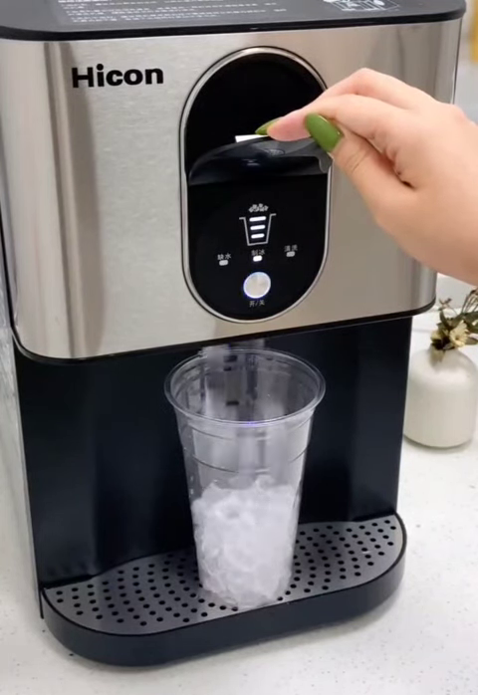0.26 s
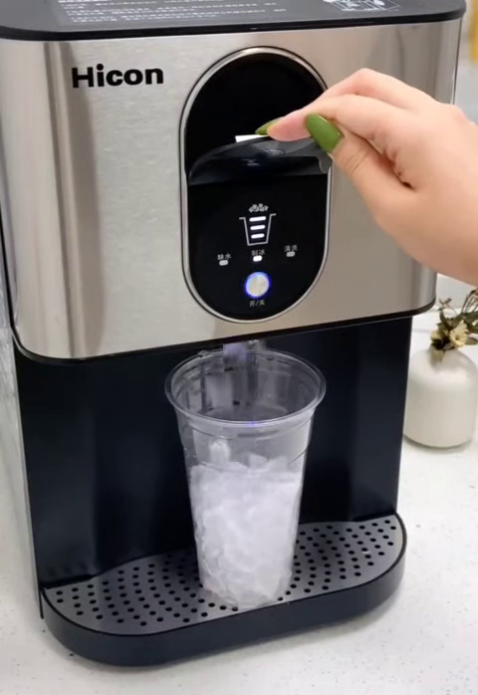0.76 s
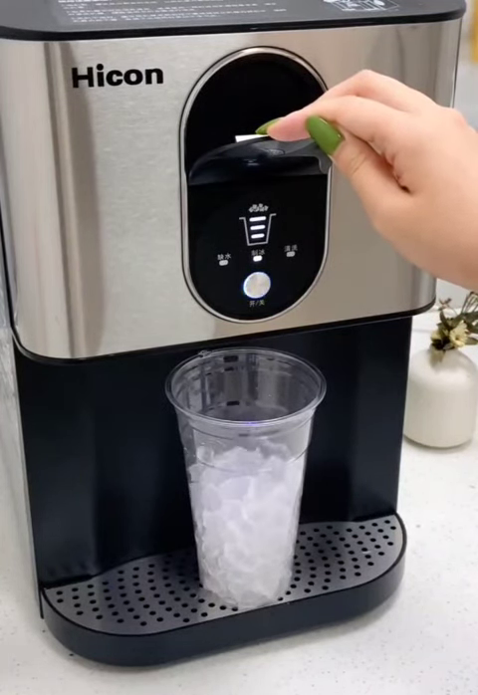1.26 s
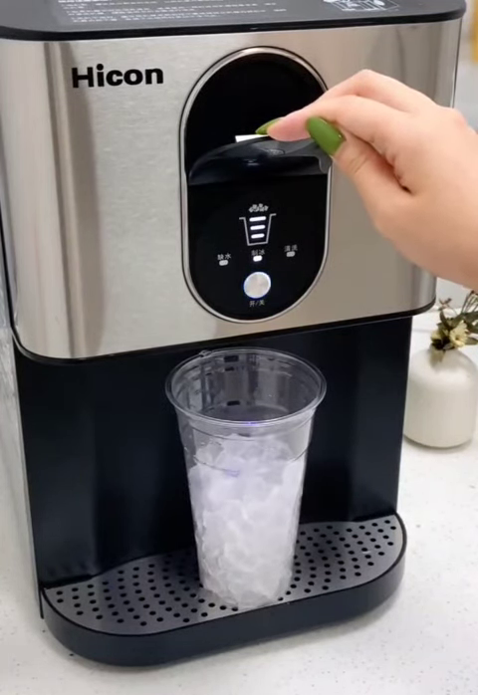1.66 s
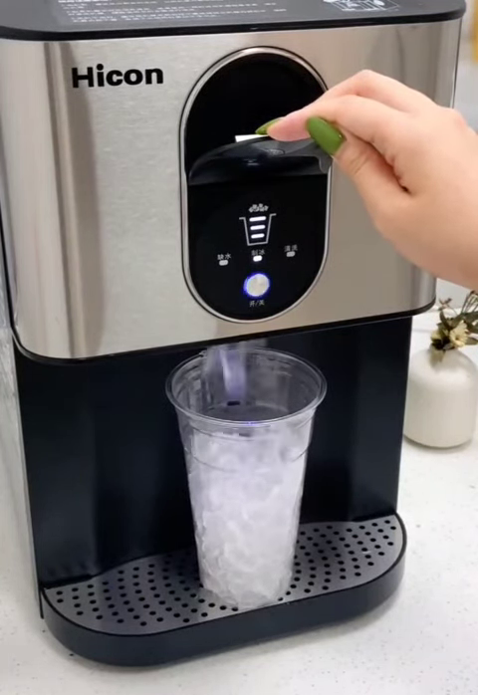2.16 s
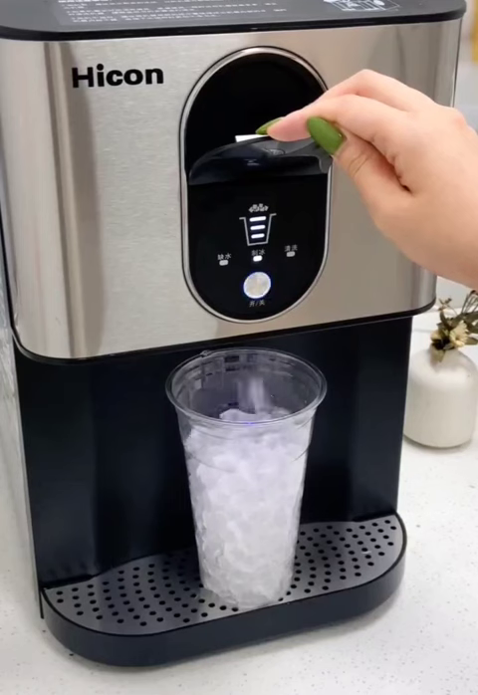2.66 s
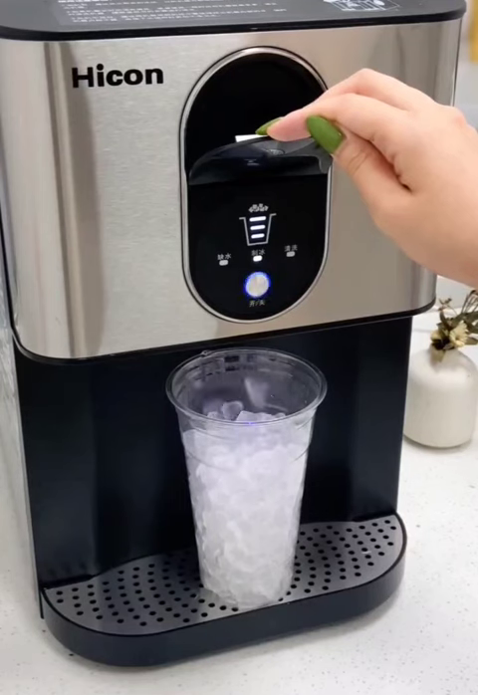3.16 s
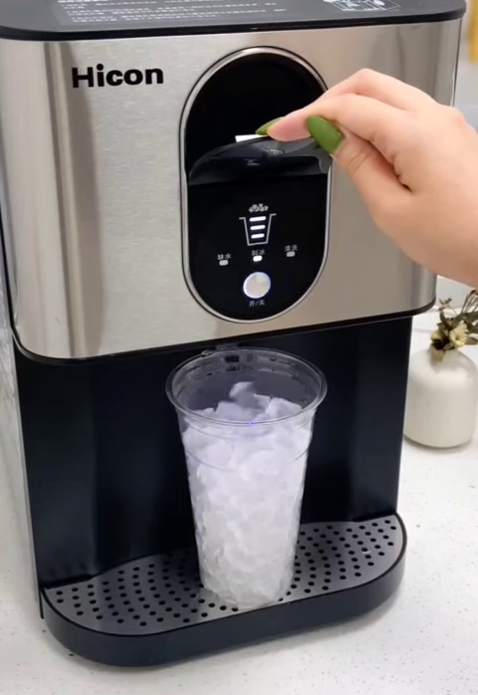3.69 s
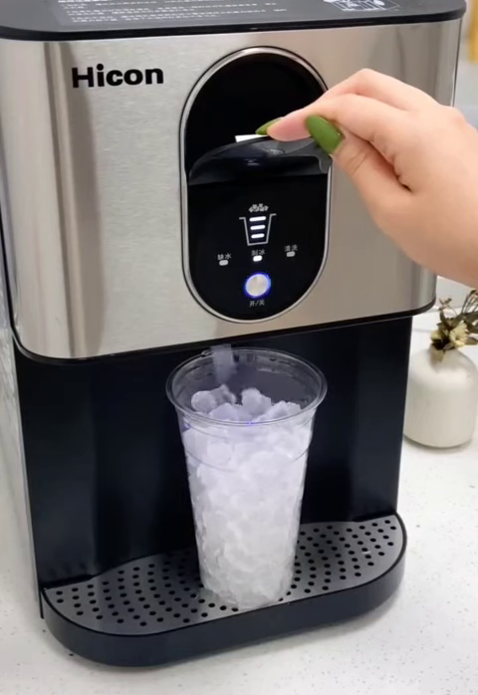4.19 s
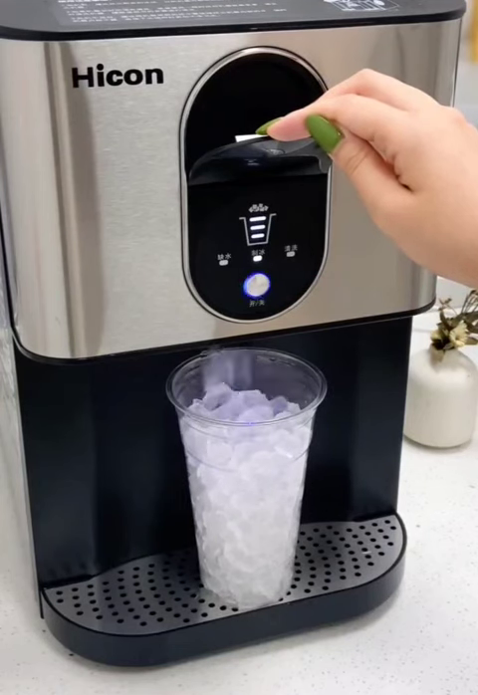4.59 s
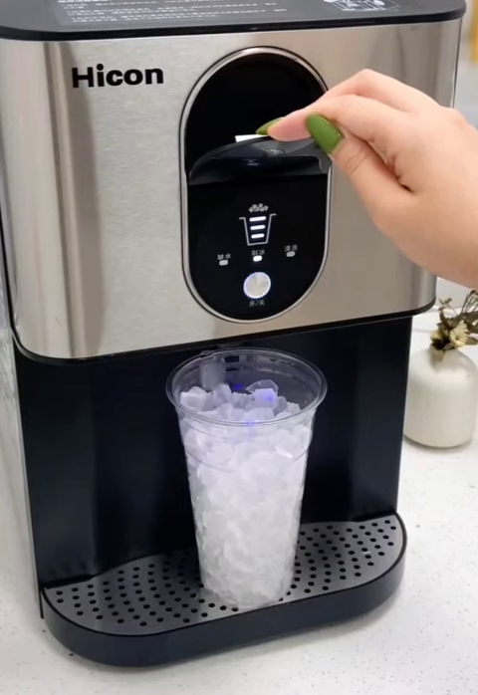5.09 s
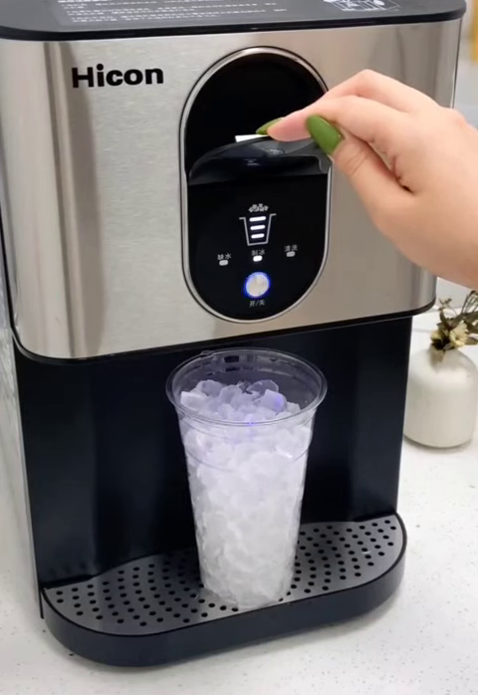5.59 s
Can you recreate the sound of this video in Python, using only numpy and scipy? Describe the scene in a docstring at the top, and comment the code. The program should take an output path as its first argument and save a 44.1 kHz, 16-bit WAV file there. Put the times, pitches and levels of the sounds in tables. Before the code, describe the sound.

Bright, brittle ice pieces rattle and tumble in dense bursts, with metallic pings, gritty crumbs and dull hollow knocks in a quiet, dry room.

```python
"""Nugget ice pushed along by a countertop ice maker, heard close in a dry room: clacks of ice on ice (decaying
noise and sines), blows on a ringing metal part (modal synthesis) and knocks on a hollow housing (damped modes).
Crumbs grind between the blows (dense random contacts) and the housing rumbles (resonated noise).
One stretch of clatter comes round about every 2.3 s over a faint motor hum and room tone."""
import sys
import numpy as np
from scipy import signal
from scipy.fft import rfft, irfft
from scipy.io import wavfile
from scipy.ndimage import uniform_filter1d

SR = 44100
rng = np.random.default_rng(int(sys.argv[2]) if len(sys.argv) > 2 else 0)


def dump_mix(stems):
    """Bounce the given channels to the path in sys.argv[1] as a 16-bit WAV at rate SR."""
    frames = np.atleast_2d(stems).T  # one column per channel
    limited = np.clip(frames, -1, 1)  # hard clip at full scale
    pcm = np.round(limited * 32767).astype(np.int16)
    wavfile.write(sys.argv[1], SR, pcm)


N = 257984
TIME = np.arange(N) / SR  # s
AGE = TIME[:SR // 3]  # time since a blow, s


def undb(db):
    """Level to amplitude: 20 dB is a factor of ten."""
    return 10 ** (np.asarray(db) / 20)


def fade(t60):
    """Exponential decay: the amplitude falls by 60 dB in t60 seconds."""
    return np.exp(-np.log(1000) * AGE / max(t60, 1e-3))


def add(out, s, sound):
    """Superposition: mix a short sound in at time s."""
    i = int(s * SR)
    out[i:i + len(sound)] += sound[:N - i]


def noise(points):
    """Spectral shaping: white noise filtered through (Hz, dB) points and scaled to rms 1."""
    hz, db = np.transpose(points)
    f = np.maximum(np.arange(N // 2 + 1) * SR / N, 1)
    gain = undb(np.interp(np.log(f), np.log(hz), db))
    x = irfft(rfft(rng.standard_normal(N)) * gain, N)
    return x / x.std()


def walk(rate):
    """Random modulation: smoothed random steps, rate per second, with a standard deviation of 1."""
    k = int(SR / rate)
    steps = np.repeat(rng.standard_normal(N // k + 1), k)
    x = uniform_filter1d(uniform_filter1d(steps, k), k)[:N]
    return x / x.std()


def tone(hz, wobble=0.):
    """Frequency modulation: a sine of rms 1 whose pitch wanders by the fraction wobble."""
    phase = np.cumsum(hz * (1 + wobble * walk(60))) / SR + rng.random()
    return np.sqrt(2) * np.sin(2 * np.pi * phase)


def partials(low_hz, high_hz, places):
    """Inharmonic modes: sines at the given places (0-1) of a log pitch range, with random phases."""
    hz = low_hz * (high_hz / low_hz) ** places[:, None]
    sines = np.sin(2 * np.pi * (hz * AGE + rng.random(hz.shape)))
    return sines.sum(axis=0) / np.sqrt(len(places))


def swell(times, dbs, shapes, rise_s):
    """Energy addition: each blow adds energy that drains away; returns the amplitude."""
    energy = np.zeros(N)
    for s, db, shape in zip(times, dbs, shapes):
        add(energy, s, (undb(db) * shape * np.minimum(AGE / rise_s, 1)) ** 2)
    return np.sqrt(energy)


def contact(t60, tail_db, tail_t60):
    """Two-stage decay: a short rattle of ice and a weak tail inside the chute."""
    return fade(t60) + undb(tail_db) * fade(tail_t60)


# noise spectrum of an ice contact: f/Hz, relative level per Hz/dB
CLACK_SPECTRUM = [(40, -16.5), (180, -17), (400, -17), (900, -6.5), (1250, -6), (1550, -7), (2400, 4),
                  (3400, 1), (4400, -6), (5400, -1.5), (6500, -12.5), (9000, -26)]
# noise spectrum of a brittle snap: f/Hz, relative level per Hz/dB
SNAP_SPECTRUM = [(3000, -15), (5000, 9.5), (6600, 4), (7400, -1), (8000, 12), (9300, -13.5), (11000, -5),
                 (12200, 2.5), (13100, -13.5), (13700, -19), (15700, -29), (17000, -38)]


def nuggets(times, clack_db, pitch_hz, snap_db, count=6):
    """Impact excitation: a nugget rattles, snaps in the treble and rings with a main mode and others."""
    clack_shape = contact(t60=0.018, tail_db=-14.0, tail_t60=0.12)
    snap_shape = contact(t60=0.015, tail_db=-15, tail_t60=0.08)
    clack = swell(times, clack_db, [clack_shape] * len(times), rise_s=0.00035)
    snap = swell(times, snap_db, [snap_shape] * len(times), rise_s=0.00026)
    pitched = np.zeros(N)
    mode_places = rng.random((len(times), 2, count))
    for s, db, hz, top_db, places in zip(times, clack_db, pitch_hz, snap_db, mode_places):
        body = undb(-2.5) * fade(0.037) * np.sin(2 * np.pi * hz * AGE)
        body += undb(-7.0) * fade(0.057) * partials(1515, 5000, places[0])
        ping = undb(-14.5) * fade(0.019) * partials(6870, 13000, places[1])
        onset = np.minimum(AGE / 0.00037, 1)
        add(pitched, s, (undb(db) * body + undb(top_db) * ping) * onset)
    chatter = undb(2.25 * np.clip(walk(450), -2, 1))  # an uneven, skidding contact
    rattle = undb(-3.5) * chatter * clack * noise(CLACK_SPECTRUM)
    return rattle + undb(-1.0) * snap * noise(SNAP_SPECTRUM) + pitched


# a clack this loud (relative level/dB) is the limit in a strike: ice crumbles under a harder blow
HARDEST_CLACK_DB = -24.5
# the nugget's own clack in a strike: level against the strongest ring/dB, f/Hz
STRIKE_CLACK_DB, STRIKE_HZ = -11.5, 3110
# nuggets that strike the metal part: t/s in the middle round, relative level/dB of the low, middle and
# high ring, ring length as a share of the free ring, relative level/dB of the brittle snap
STRIKES = [(2.3015, -23, -49, -63, 1.01, -27.5), (2.3513, -29, -25, -39, 0.43, -29.5),
           (2.3793, -34.5, -36, -46, 0.43, -55), (2.3903, -64, -41, -17.5, 0.69, -38),
           (2.4156, -14, -56.5, -16.5, 0.98, -26.5), (2.4227, -21, -21.5, -14.5, 1.33, -21),
           (2.4655, -77, -54, -7, 0.49, -20.5), (2.4827, -39, -37.5, -20.5, 0.86, -50),
           (2.5262, -39, -37.5, -27.5, 0.97, -54), (2.5813, -17.5, -19, -33, 0.58, -23),
           (2.601, -20, -19.5, -23.5, 1.11, -23), (2.6473, -31.5, -40, -31.5, 1.94, -31),
           (2.6914, -54, -55, -23.5, 1.16, -38), (2.7569, -50, -53, -29.5, 0.96, -63),
           (2.8034, -18.5, -18, -22, 0.5, -25.5), (2.8055, -15.5, -18, -26.5, 1.098, -41),
           (2.8393, -42, -19, -23, 0.6, -46), (2.858, -41.5, -30, -22, 1.23, -45),
           (2.981, -23.5, -28.5, -13, 0.95, -24), (3.0193, -34.5, -38, -22.5, 1.2, -42),
           (3.139, -26, -44, -45.5, 0.78, -35.5), (3.1609, -32.5, -28.5, -29, 1.48, -31.5),
           (3.2307, -28.5, -38, -22.5, 0.74, -40), (3.3039, -24, -24, -35.5, 1.13, -31),
           (3.3338, -43, -19, -30, 1.23, -20.5), (3.4787, -27.5, -27, -41, 0.5, -39),
           (3.5438, -43, -19, -59, 0.81, -20), (3.5616, -15, -11, -54, .33, -23),
           (3.7886, -34, -19.5, -49, 0.71, -26), (3.799, -63, -22, -52, 0.62, -42),
           (4.0243, -43.5, -71, -52, 1.2, -66), (4.1449, -24.5, -26.5, -52, 0.13, -40),
           (4.228, -34, -53, -45, 0.72, -56), (4.2572, -29.5, -60, -37, 0.44, -53),
           (4.3527, -27, -58, -60, 0.097, -51), (4.4016, -21.5, -25, -60, 0.21, -26.5)]


def strikes():
    """Common excitation: one blow starts both the metal's ring and the nugget's own clack."""
    times, *ring_dbs, lengths, snap_db = np.transpose(STRIKES)
    force_db = np.max(ring_dbs, axis=0)
    clack_db = np.minimum(force_db + STRIKE_CLACK_DB, HARDEST_CLACK_DB)
    pitch_hz = STRIKE_HZ * np.exp(0.09 * rng.standard_normal(len(times)))
    return np.array([times, clack_db, pitch_hz, snap_db, lengths, *ring_dbs])


# brushing the metal: low, middle and high ring against the clack/dB, scatter either way/dB, share of free ring
GLANCE_DB, GLANCE_SCATTER_DB, GLANCE_LENGTH = (-17.5, -11.5, -12), 4, 0.62


def glancing(times, clack_db, pitch_hz, snap_db, ring_db):
    """Weak coupling: blows of ice on ice only brush the metal, which rings weakly and briefly."""
    scatter_db = GLANCE_SCATTER_DB * (2 * rng.random((len(times), 3)) - 1)
    ring_dbs = (clack_db[:, None] + np.array(ring_db) + scatter_db).T
    lengths = np.full(len(times), GLANCE_LENGTH)
    return np.array([times, clack_db, pitch_hz, snap_db, lengths, *ring_dbs])


# nuggets that clack on each other: t/s in the middle round, relative clack level/dB, main mode f/Hz,
# relative level of the brittle snap/dB
CLACKS = [(2.135, -28, 2450, -43), (2.215, -33.5, 2570, -48), (2.2621, -37, 1790, -45),
          (2.3484, -28, 3630, -34), (2.4373, -28.5, 3590, -24), (2.4512, -27, 3100, -44),
          (2.4774, -22, 1613, -37), (2.5371, -32.5, 3040, -37.5), (2.5783, -42, 3070, -47),
          (2.6491, -23.5, 2870, -39), (2.6923, -24.5, 3290, -50), (2.73, -61, 2700, -50),
          (2.7757, -25, 3600, -59), (2.8459, -21.5, 3270, -24.5), (2.8721, -28, 2400, -42),
          (3.1481, -31.5, 3250, -33.5), (3.1576, -23.5, 1900, -30), (3.203, -35.5, 2880, -37),
          (3.2433, -21.5, 3090, -30.5), (3.2834, -26.5, 1460, -33.5), (3.2953, -24, 3630, -53),
          (3.3227, -19.5, 3057, -41), (3.3908, -30, 1455, -54), (3.4147, -34.5, 3000, -33.5),
          (3.4325, -32.5, 1486, -37.5), (3.4502, -27, 3820, -76), (3.5143, -29.5, 1400, -52),
          (3.5338, -29, 3040, -32), (3.6595, -53, 3000, -45), (3.6735, -23.5, 3770, -28.5),
          (3.7121, -36, 2900, -53), (3.7252, -45, 2400, -32), (3.835, -38.5, 3960, -44.5),
          (3.9315, -33.5, 1410, -42), (3.987, -34.5, 1360, -42), (4.0714, -24.5, 1915, -28.5),
          (4.1745, -40, 2290, -50), (4.2074, -36.5, 3440, -37), (4.3293, -46, 1380, -39),
          (4.391, -27, 1480, -42), (4.437, -49, 2000, -72)]


def clacks():
    """Collision of like bodies: ice meets ice, with a slight share of the blow passed to the metal."""
    return glancing(*np.transpose(CLACKS), GLANCE_DB)


# start and end of one round: t/s
ROUND_S = (2.12, 4.455)
# small nuggets: rate per second, level over the crumbs/dB, scale of the random excess/dB
JOSTLE_PER_S, JOSTLE_DB, JOSTLE_SPREAD_DB = 42, 3, 3
# their pitch range f/Hz, snap and low ring against the clack/dB
JOSTLE_HZ, JOSTLE_SNAP_DB, JOSTLE_RING_DB = (1380, 3860), -6.5, 2


def jostle(crumb_db):
    """Random point process: small nuggets shift by chance, louder when the ice grinds harder."""
    start, end = ROUND_S
    when, size, place = rng.random((int(JOSTLE_PER_S * (end - start)), 3)).T
    times = start + when * (end - start)
    excess_db = JOSTLE_SPREAD_DB * np.minimum(-np.log(1 - size), 2)
    db = np.interp(times, TIME, crumb_db) + JOSTLE_DB + excess_db
    low_hz, high_hz = JOSTLE_HZ
    pitch_hz = low_hz * (high_hz / low_hz) ** place
    return glancing(times, db, pitch_hz, db + JOSTLE_SNAP_DB, (JOSTLE_RING_DB, *GLANCE_DB[1:]))


# modes of the metal part, in groups that sound together (low, middle, high, pings of a brittle snap):
# f/Hz, relative level/dB, free t60/s
METAL_MODES = [
    [(2052, 0, .13)],
    [(4651, 0, .085), (8020, -23, .06), (12118, -23, .07)],
    [(5749, 0, .052), (5610, -13, .045), (8507, -21, .058), (10880, -31, .095), (11660, -29, .058),
     (12566, -25, .055), (13053, -28, .052)],
    [(8020, -8, .035), (12118, -9.5, .045)],
]


def metal(times, group_dbs, lengths, scatter_db=3):
    """Modal synthesis: the blow picks the modes; leaning ice cuts the ring short and bends its pitch."""
    out = np.zeros(N)
    for modes, dbs in zip(METAL_MODES, group_dbs):
        for k, (hz, db, t60) in enumerate(modes):
            # the upper modes of a group depend on the exact spot, so each blow has its own glint
            glint_db = scatter_db * (k > 0) * np.clip(rng.standard_normal(len(times)), -2, 1)
            decays = [fade(t60 * share) for share in lengths]
            ring = swell(times, dbs + glint_db, decays, rise_s=0.00089)
            leaning = np.exp(-ring / undb(-32))  # a weak ring cannot shake the ice off
            buzz = undb(1.37 * walk(300))  # crumbs rattle against the ringing part
            out += undb(db - 1.15) * buzz * ring * tone(hz, wobble=(3 + 45 * leaning) / hz)
    return out


# share of every blow that reaches the housing: level/dB at STRIKE_HZ, slope in dB per octave of pitch
KNOCK_DB, KNOCK_DB_PER_OCTAVE = -17, -6.5
# heavy knocks on the housing: t/s in the middle round, relative level/dB
KNOCKS = [(2.1339, -33), (2.4127, -24), (2.6491, -34), (3.5338, -40), (3.989, -39), (4.436, -47)]


def knocks(times, clack_db, pitch_hz):
    """Structure-borne transmission: every clack reaches the housing, big, low nuggets most."""
    light_db = clack_db + KNOCK_DB + KNOCK_DB_PER_OCTAVE * np.log2(pitch_hz / STRIKE_HZ)
    return np.hstack([[times, light_db], np.transpose(KNOCKS)])


# modes of the hollow housing: f/Hz, relative level/dB, t60/s
HOUSING_MODES = [(629.4, 3.5, 0.054), (747, -16.5, 0.14), (220, -28, 0.013), (101, -22.5, 0.076)]


def housing(times, knock_db, rumble_db, rumble_hz):
    """Resonance: the hollow housing answers knocks and scraping; part of the rumble shifts with the load."""
    ring = sum(undb(db) * fade(t60) * np.cos(2 * np.pi * hz * AGE) for hz, db, t60 in HOUSING_MODES)
    blunt_push = signal.butter(2, 1100, fs=SR, output="sos")
    ring = signal.sosfilt(blunt_push, ring * np.minimum(AGE / 0.0012, 1))
    out = np.zeros(N)
    for s, db in zip(times, knock_db):
        add(out, s, undb(db - 0.3) * ring)
    steady = signal.fftconvolve(rng.standard_normal(N), ring)[:N]
    # smoothed complex noise, moved up to the drifting rumble pitch
    complex_noise = rng.standard_normal(N) + 1j * rng.standard_normal(N)
    scrape = signal.fftconvolve(complex_noise, fade(0.073) - fade(0.011))[:N]
    shifting = np.real(scrape * np.exp(2j * np.pi * np.cumsum(rumble_hz) / SR))
    rumble = undb(1.0) * shifting / shifting.std() + undb(-11.5) * steady / steady.std()
    return out + undb(rumble_db) * rumble


def crumbs(crumb_db, per_s=380, spread_db=3.5):
    """Granular synthesis: tiny random contacts of varied pitch, which keep the metal faintly ringing."""
    chance = rng.random((int(per_s * N / SR), 3))
    times = chance[:, 0] * TIME[-1]
    size_db = spread_db * np.minimum(-np.log(1 - chance[:, 1]), 3.2)
    ticks = np.zeros(N)
    for s, db, place in zip(times, size_db, chance[:, 2]):
        add(ticks, s, undb(db) * fade(0.012) * np.sin(2 * np.pi * 1300 * 3.7 ** place * AGE))
    ticks = signal.sosfilt(signal.butter(2, 900, "highpass", fs=SR, output="sos"), ticks)
    grit = swell(times, size_db, [fade(0.0051)] * len(times), rise_s=0.00017)
    grit /= np.sqrt(np.mean(grit ** 2))
    # pressed by ice, the lowest metal mode is damped and sags in pitch
    damped = signal.fftconvolve(ticks, fade(0.047) * np.sin(2 * np.pi * 2020 * AGE))[:N]
    grind = grit * (undb(-6.5) * noise(CLACK_SPECTRUM) + undb(-19) * noise(SNAP_SPECTRUM))
    crunch = ticks / ticks.std() + grind
    return undb(crumb_db) * (crunch + undb(-9.5) * damped / damped.std())


# gain on the two level columns of the feed/dB, smoothing time of a stall/s
CRUMB_DB, RUMBLE_DB, STALL_SLEW_S = -7.5, 2.5, 0.008
# ice feeding along: t/s in the middle round, relative level of the crumbs/dB and of the housing rumble/dB
FEED = [(2.12, -43.5, -47), (2.42, -39.5, -76), (2.51, -41, -65.5), (2.68, -40.5, -65), (2.87, -42, -56.5),
        (2.96, -47.5, -58.5), (3.09, -51.5, -58.5), (3.3, -34, -54), (3.38, -40.5, -50.5),
        (3.48, -40, -50.5), (3.76, -41.5, -55), (3.99, -42.5, -61), (4.13, -42.5, -52), (4.26, -45, -59),
        (4.44, -49.5, -53)]
# pitch of the rumble, which shifts with the load: t/s, f/Hz
RUMBLE_PITCH = [(2.12, 655), (2.3, 589), (2.5, 641.8), (2.78, 672), (3.02, 741.8), (3.57, 736), (3.62, 633),
                (3.95, 588.7), (4.44, 634.4)]
# the feed stalls: start t/s, end t/s, change of level/dB
STALLS = [(3.355, 3.412, -10), (3.579, 3.69, -16.5), (3.746, 3.924, -15.5)]


def feed():
    """Amplitude control: crumb level, rumble level and rumble pitch; both levels sink in a stall."""
    s, crumb_db, rumble_db = np.transpose(FEED)
    stalled_db = sum(np.where((TIME > start) & (TIME < end), db, 0.) for start, end, db in STALLS)
    dip_db = uniform_filter1d(stalled_db, int(STALL_SLEW_S * SR))
    dip_db[(TIME < ROUND_S[0]) | (TIME > ROUND_S[1])] = -np.inf  # silent outside the round
    crumb_level = np.interp(TIME, s, crumb_db) + CRUMB_DB + dip_db
    rumble_level = np.interp(TIME, s, rumble_db) + RUMBLE_DB + dip_db
    return crumb_level, rumble_level, np.interp(TIME, *np.transpose(RUMBLE_PITCH))


def reverberation(ice):
    """Diffuse decay: the dry room answers with a weak, short tail of noise after 4 ms."""
    room = rng.standard_normal(len(AGE)) * fade(0.069) * (AGE > .004)
    return undb(-33) * signal.fftconvolve(ice, room / np.linalg.norm(room))[:N]


# motor hum: f/Hz, rms level/dB
HUM = [(48.4, -81), (118.4, -80)]
# spectrum of the room tone: f/Hz, relative level per Hz/dB
ROOM_TONE = [(20, 5.5), (45, 15), (130, 5.5), (350, -2.5), (700, 7), (1100, -2), (2500, -35), (6000, -41.5),
             (15000, -59)]


def background():
    """Stationary sources: faint motor hum of wandering sines, and room tone of shaped noise."""
    hum = sum(undb(db) * tone(hz, wobble=0.0034) for hz, db in HUM)
    return hum + undb(-67.5) * noise(ROOM_TONE)


# when each round comes, against the middle one: t/s
ROUND_SHIFTS_S = [-2.3421, 0, 2.2989]


def scene():
    """Superposition: one round of clatter, laid down three times in copy, over the steady background."""
    crumb_db, rumble_db, rumble_hz = feed()
    blows = np.hstack([strikes(), clacks(), jostle(crumb_db)])
    times, clack_db, pitch_hz, snap_db, lengths, *ring_dbs = blows
    knock_times, knock_db = knocks(times, clack_db, pitch_hz)
    ice = nuggets(times, clack_db, pitch_hz, snap_db)
    ice += metal(times, ring_dbs + [snap_db], lengths)
    ice += housing(knock_times, knock_db, rumble_db, rumble_hz)
    ice += crumbs(crumb_db)
    ice += reverberation(ice)
    padded = np.pad(ice, N)  # the outer rounds run past the ends
    rounds = sum(padded[N - int(shift * SR):][:N] for shift in ROUND_SHIFTS_S)
    return (rounds + background())[None]


def record(dry):
    """Band limiting: a steep low-pass at 16.3 kHz keeps the top dark."""
    return signal.sosfilt(signal.ellip(8, .2, 70, 16300, fs=SR, output="sos"), dry)


dry = scene()
out = record(dry)
dump_mix(out)
```